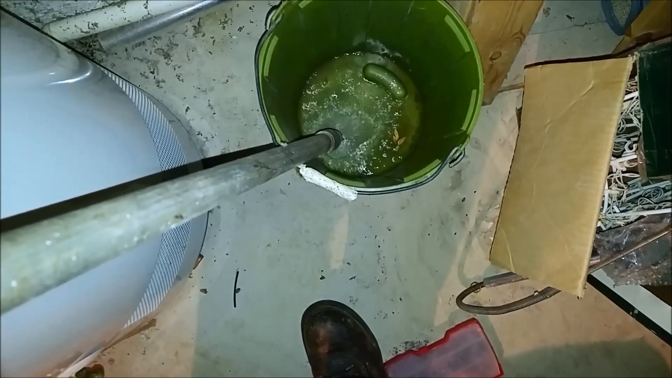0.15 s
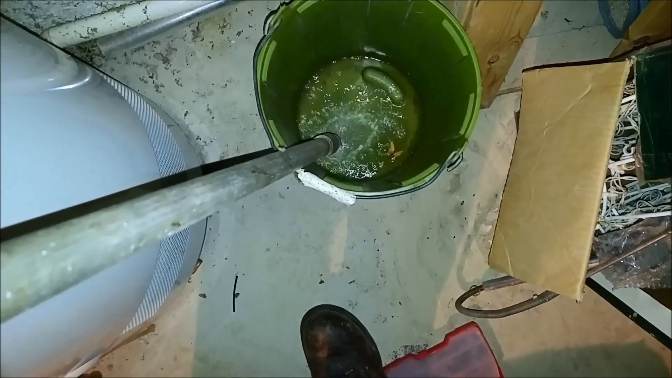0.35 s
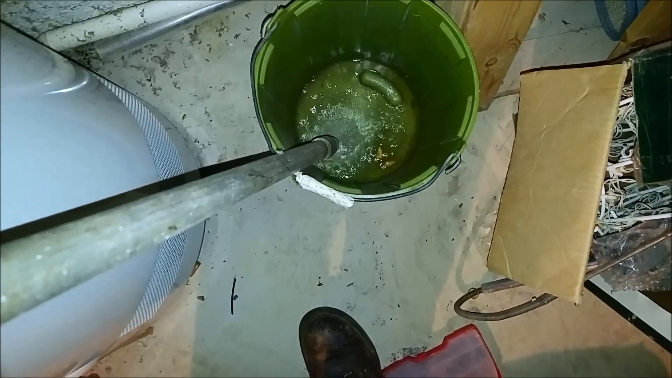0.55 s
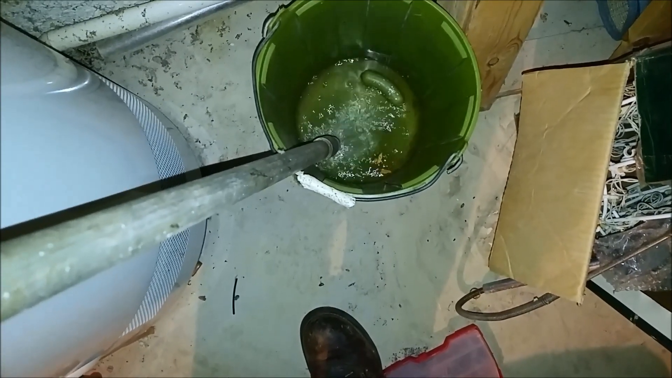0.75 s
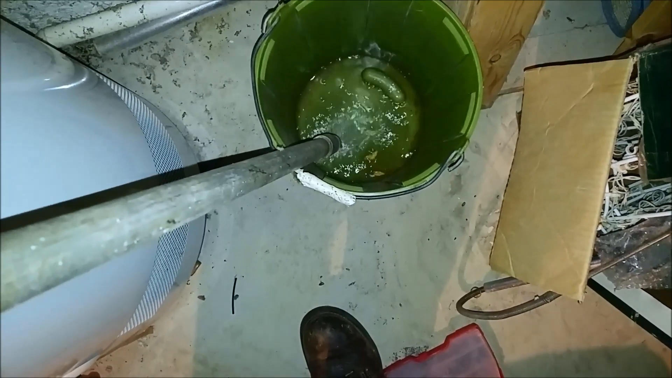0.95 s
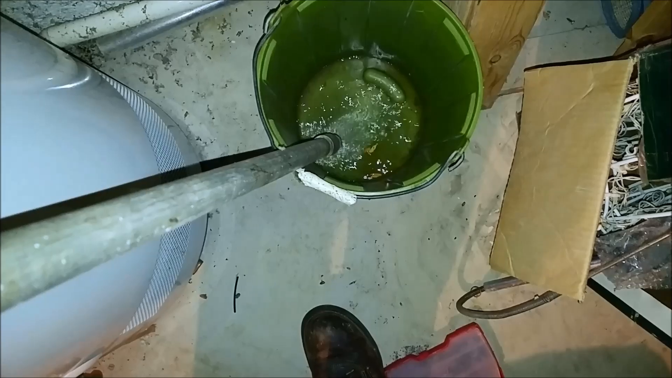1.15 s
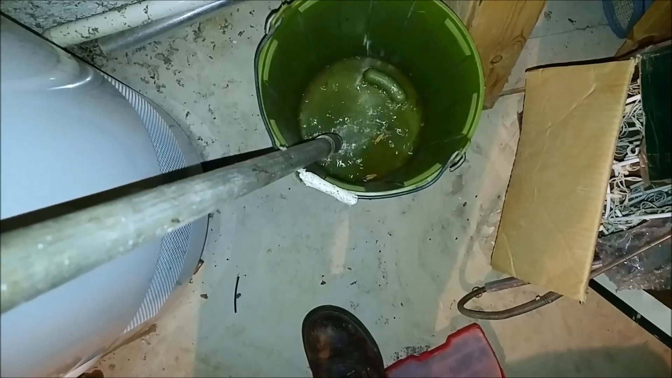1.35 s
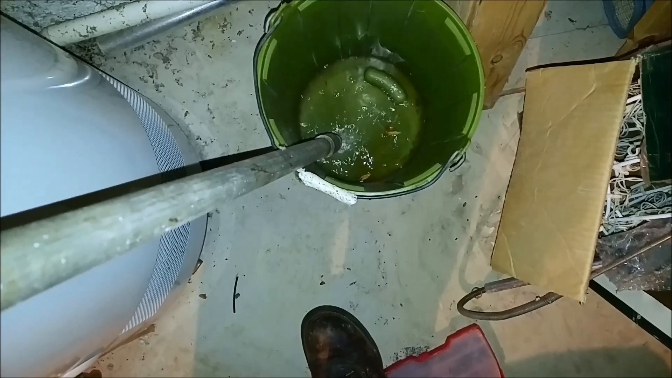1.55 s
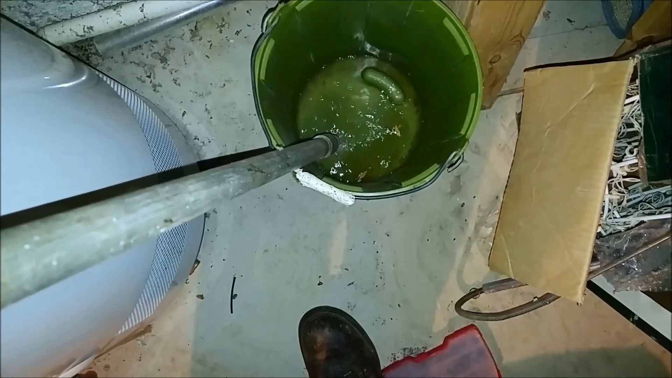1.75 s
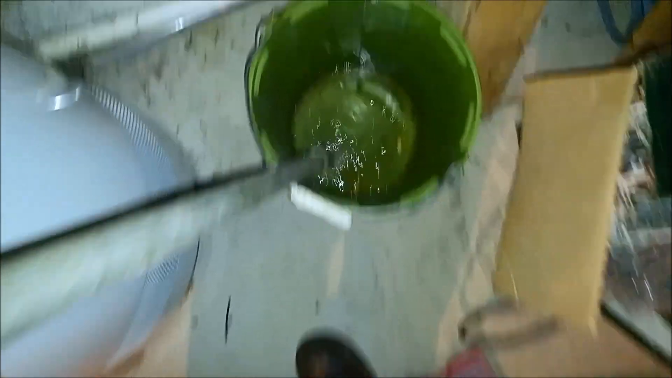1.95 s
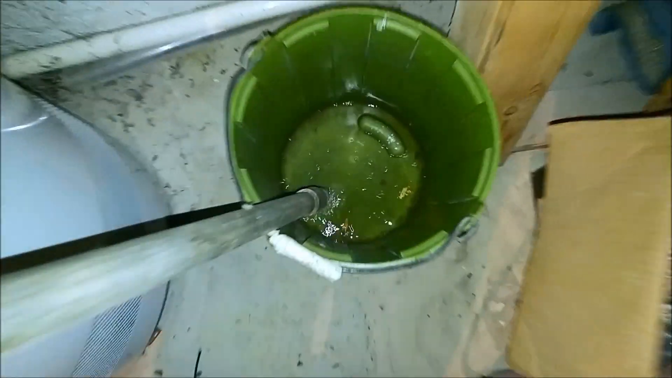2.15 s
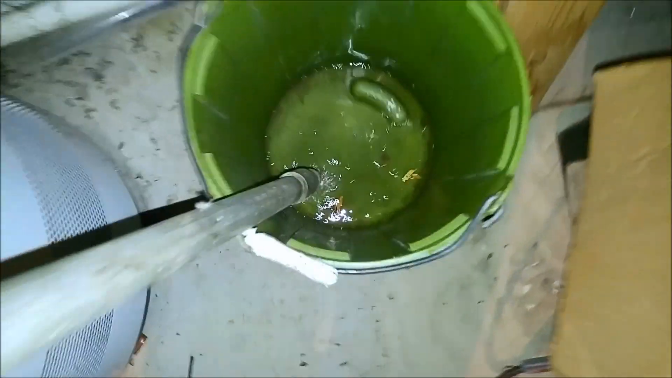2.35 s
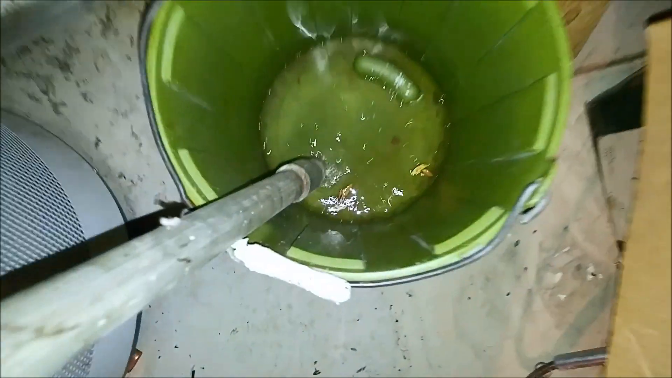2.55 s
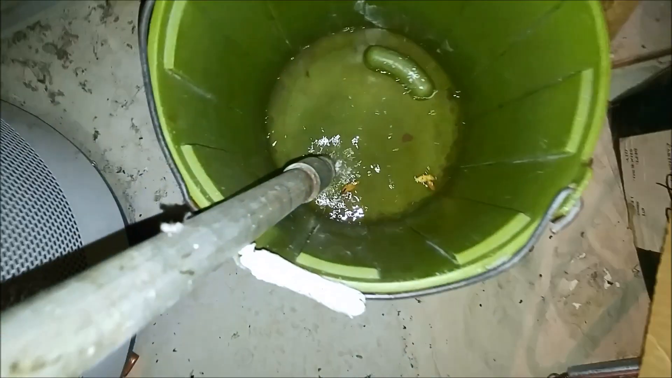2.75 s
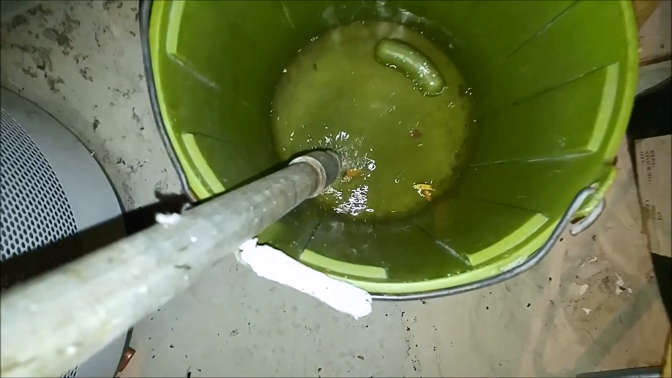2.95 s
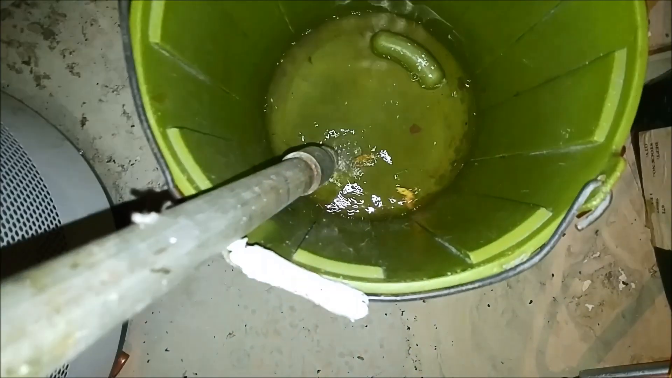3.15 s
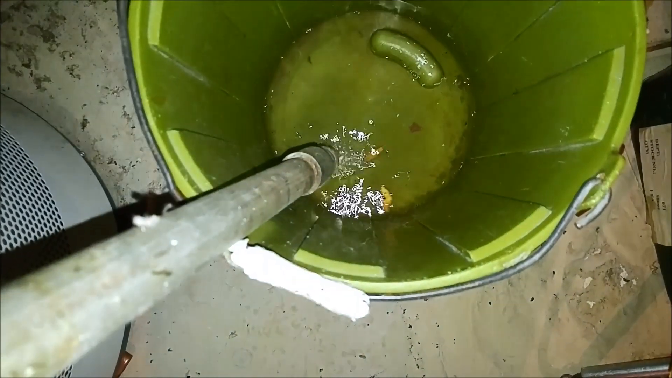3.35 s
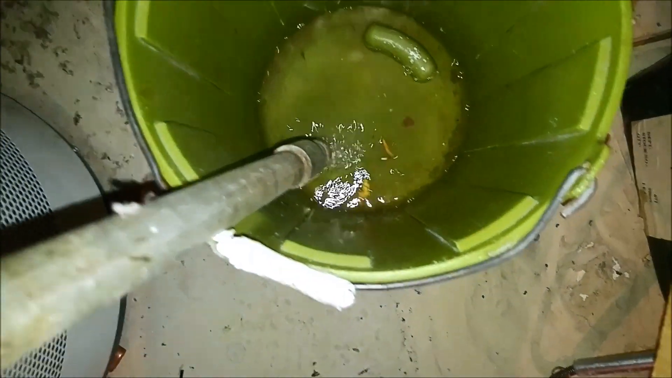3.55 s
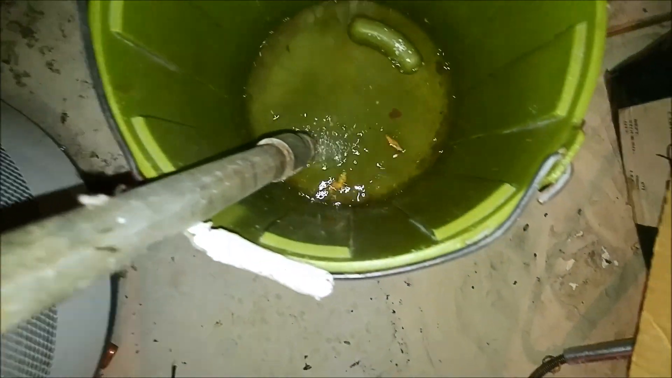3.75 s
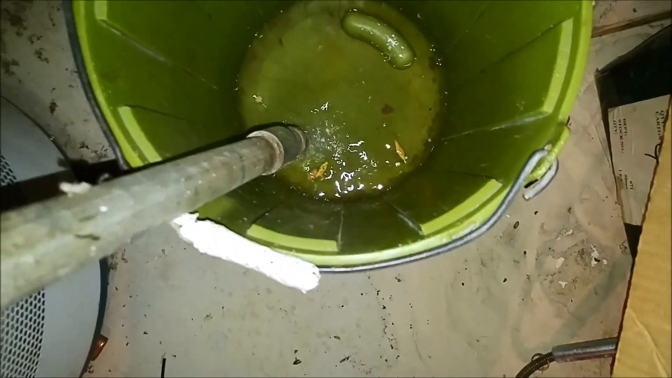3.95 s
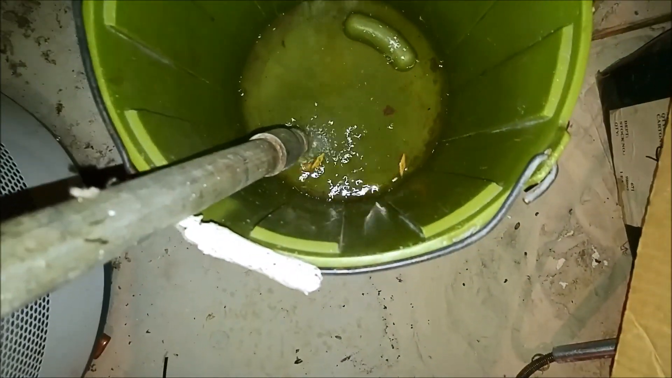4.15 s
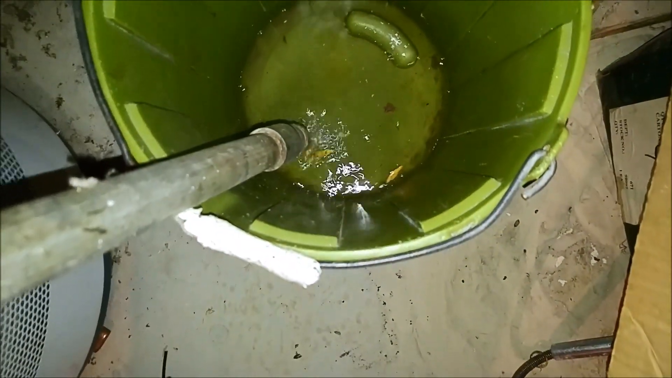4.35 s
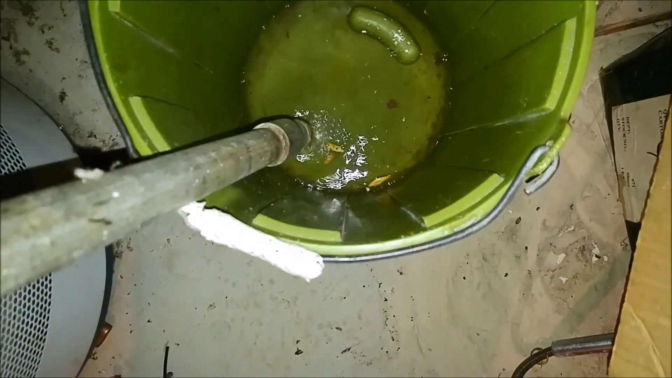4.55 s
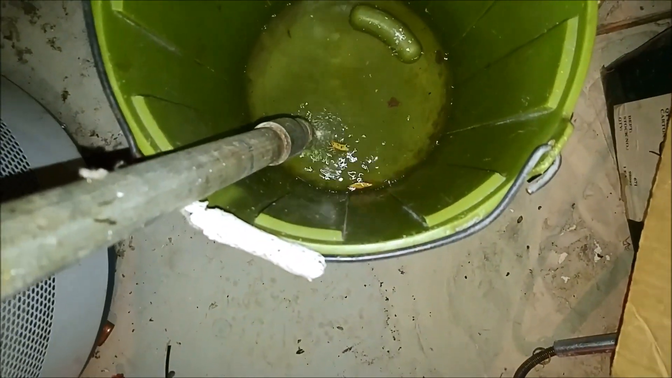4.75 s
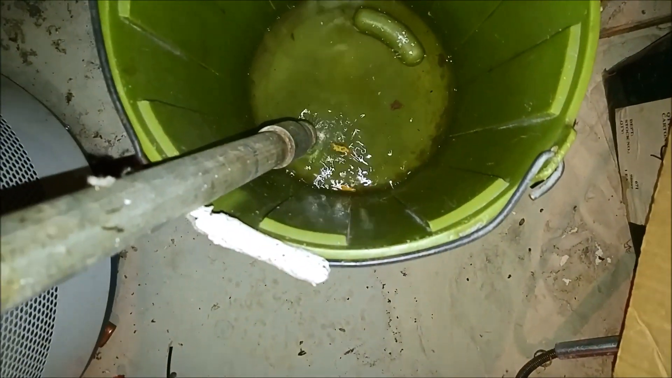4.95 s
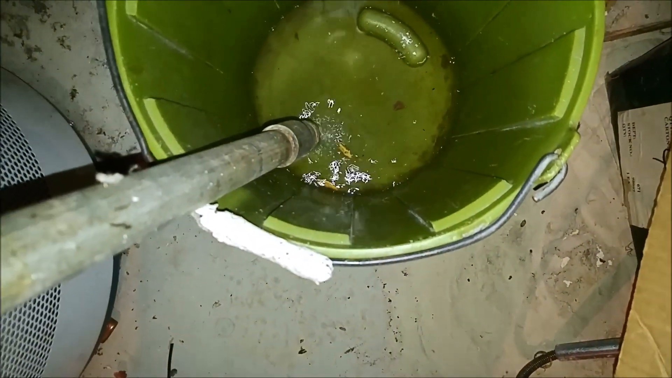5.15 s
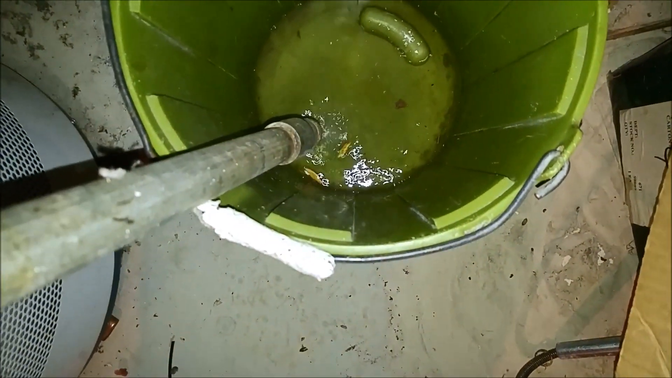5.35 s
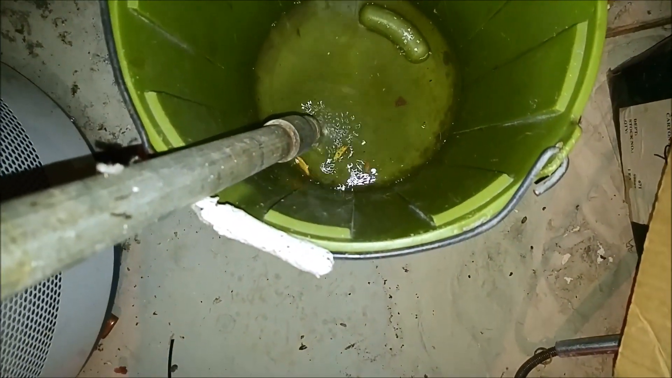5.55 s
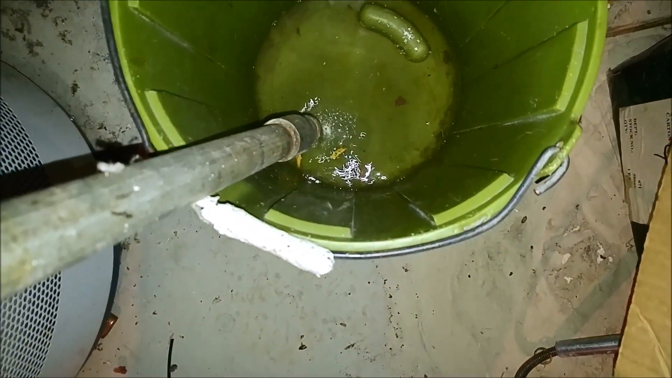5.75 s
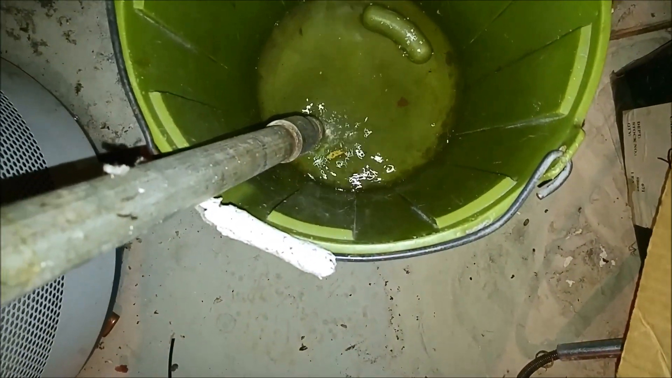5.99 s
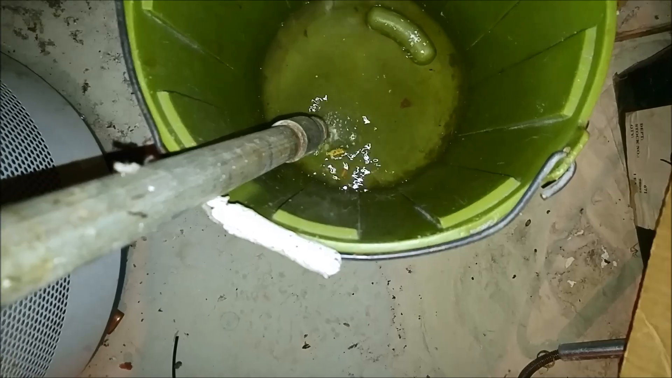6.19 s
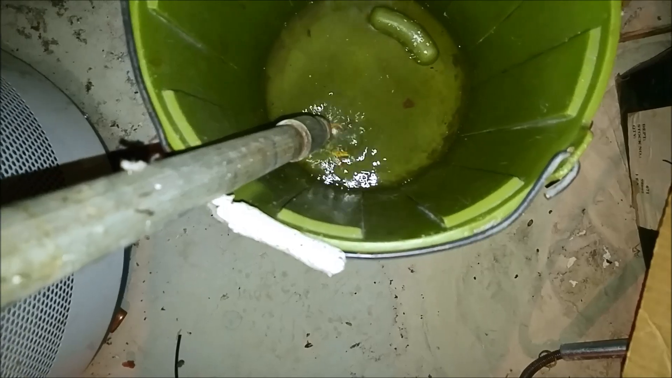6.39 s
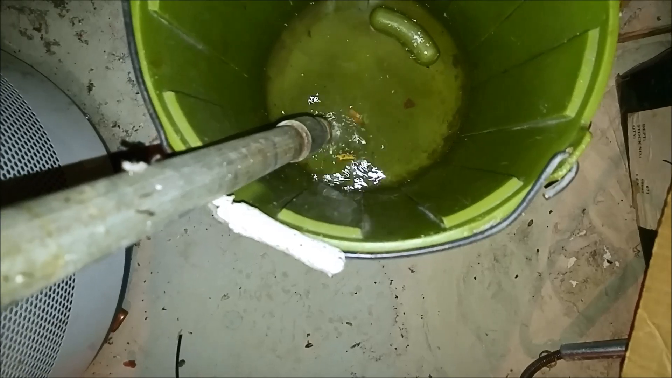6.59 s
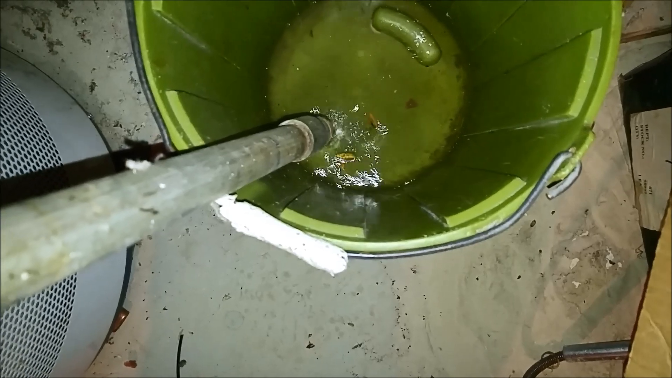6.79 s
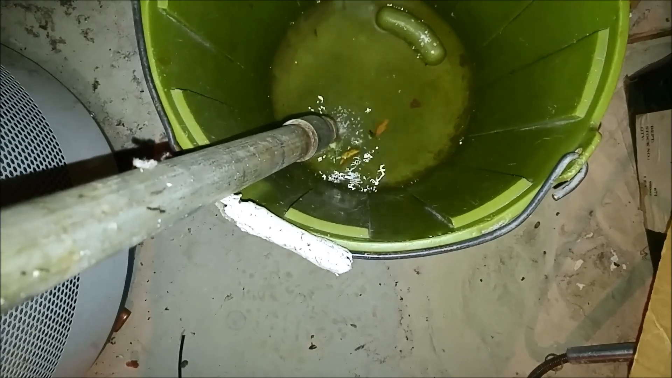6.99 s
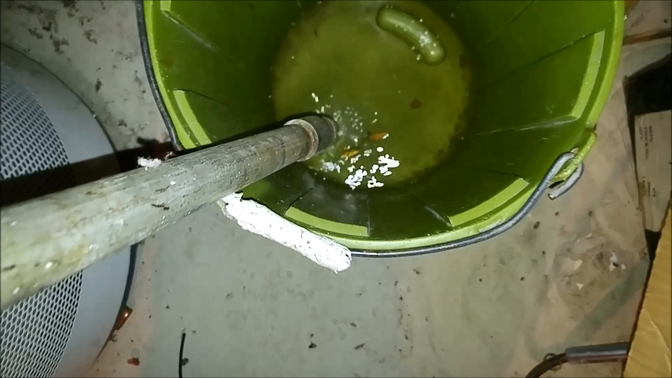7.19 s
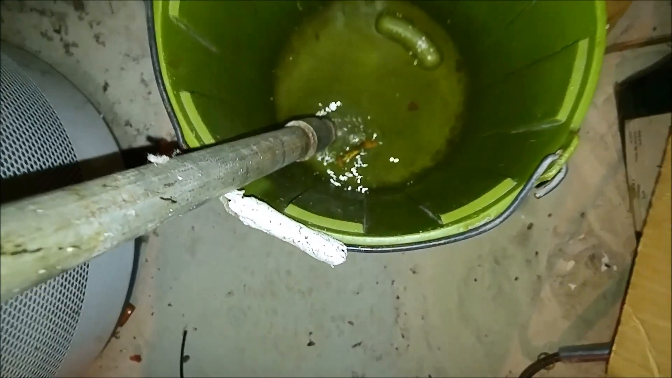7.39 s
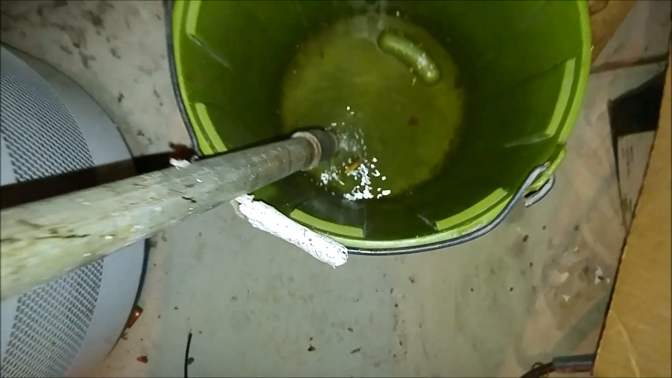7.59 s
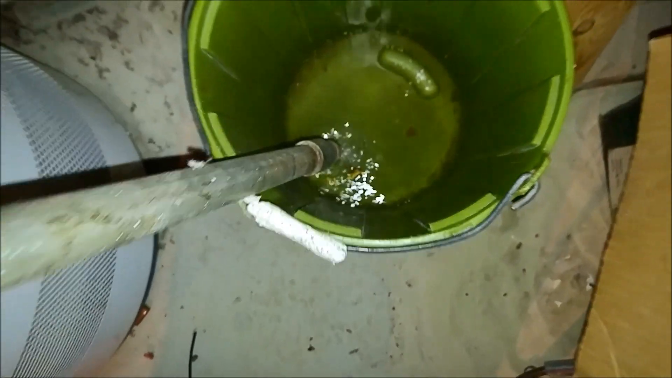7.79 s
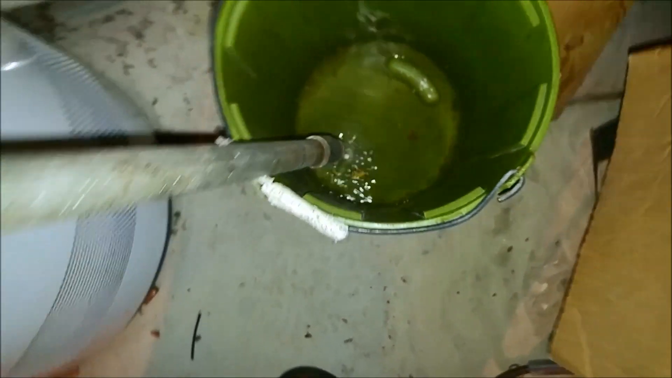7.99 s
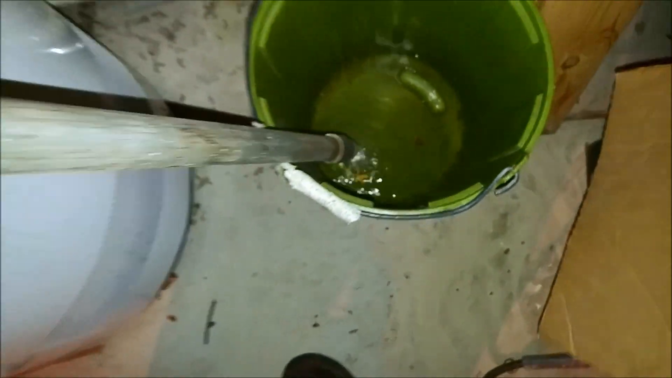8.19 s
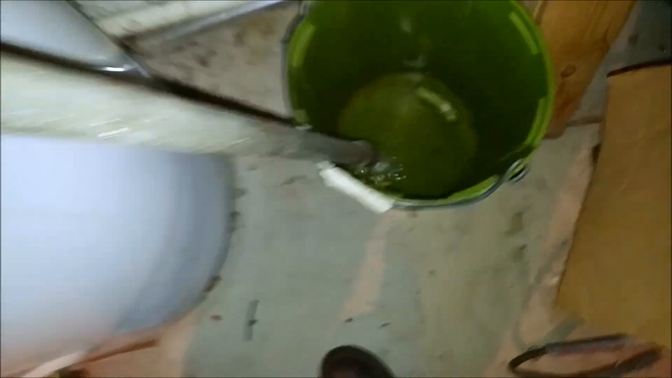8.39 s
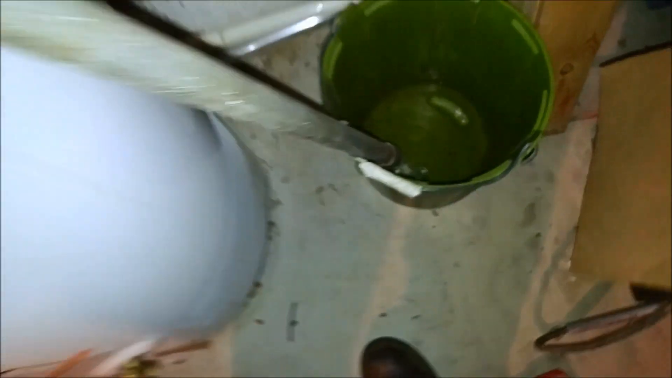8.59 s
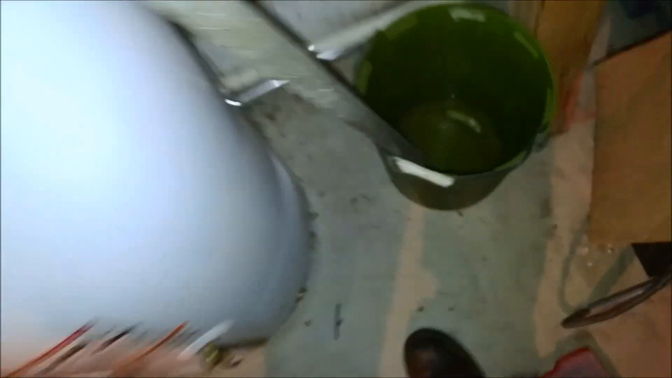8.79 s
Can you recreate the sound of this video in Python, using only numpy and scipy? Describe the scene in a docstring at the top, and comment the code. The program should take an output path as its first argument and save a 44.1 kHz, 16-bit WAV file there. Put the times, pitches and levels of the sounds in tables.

```python
"""Drain water in a plastic bucket

Water runs out of a drain pipe and splatters into a bucket with a shallow pool, in a utility room.
Noise bursts make the splats, climbing sines the bubbles, ringing grains the spray and churn, a noise band
the pipe hiss, a struck resonance one dull knock; air modes, echoes and a low rumble give the surroundings.
A hand-held two-port microphone leans in over the rim, then draws back."""
import sys
import numpy as np
from scipy import signal
from scipy.fft import rfft, irfft, next_fast_len
from scipy.io import wavfile
from scipy.ndimage import uniform_filter1d, map_coordinates

SR = 44100
rng = np.random.default_rng(int(sys.argv[2]) if len(sys.argv) > 2 else 0)


def log_audio(samples):
    """Write samples as a 16-bit WAV file to the path given in sys.argv[1]."""
    # one column per channel
    frames = np.atleast_2d(samples).T
    # limit to full scale, then quantise
    limited = np.clip(frames, -1, 1)
    pcm = np.round(limited * 32767).astype(np.int16)
    wavfile.write(sys.argv[1], SR, pcm)


N = 389398
SIZE = next_fast_len(N + SR // 2)   # FFT length, with room for the tails
HZ = np.maximum(np.arange(SIZE // 2 + 1) * SR / SIZE, 1)
SPOTS = 5   # places on the pool where water lands


def pool():
    """Falling water makes spray, fizz, churn, splats and bubbles at every spot, before the bucket colours them."""
    # strength of the stream: start_s, spray_db, churn_db
    stream = [(0.0, -39.5, -52), (0.15, -39.5, -48), (0.19, -49, -56), (0.22, -36, -50), (0.28, -42, -46),
              (0.33, -44, -56), (0.37, -35.5, -49), (0.42, -45.5, -51), (0.48, -34.5, -33),
              (0.57, -40, -48), (0.67, -38.5, -42.5), (0.72, -34, -46), (0.9, -36.5, -40.5),
              (1.79, -35, -48.5), (2.06, -38.5, -56), (2.53, -33, -42.5), (2.85, -33.5, -39),
              (3.86, -30, -43.5), (4.2, -33.5, -39.5), (4.82, -31.5, -34.5), (4.97, -32, -32.5),
              (5.08, -34, -52), (5.25, -31.5, -42), (7.01, -35, -36), (8.12, -38.5, -43),
              (8.29, -44.5, -43), (8.68, -57, -47.5), (8.83, -61, -51)]
    # loudest drops bursting: start_s, onset_level_db, centre_hz, spatter_db (against the sputter)
    loud_drops = [(0.044, -25, 8000, 5), (0.1174, -21, 8250, 2), (0.1438, -16, 8600, -14),
                  (0.2052, -26, 7100, 15), (0.2636, -22.5, 7300, -5), (0.471, -17.5, 9600, -12),
                  (0.4941, -12, 8700, -18), (0.599, -24.5, 7440, -20), (0.7008, -20, 8000, -13),
                  (0.7812, -19.5, 5570, 1), (0.9278, -18, 8100, -10), (1.0016, -23, 9460, -16),
                  (1.0301, -23, 8150, -29), (1.0949, -21.5, 5750, -3), (1.1528, -24, 5130, -18),
                  (1.1814, -18.5, 8050, -24), (1.206, -20, 8500, -19), (1.2535, -26, 9000, -12),
                  (1.3284, -25.5, 8300, -10), (1.5045, -26, 7900, 2), (1.6267, -30, 7360, -13),
                  (1.6551, -25, 8460, -10), (1.7115, -23, 8910, -22), (1.728, -21, 8750, -18),
                  (1.7614, -20, 6550, -18), (1.8243, -19, 10900, -21), (2.0524, -22.5, 8220, -18),
                  (2.0718, -19.5, 7640, 5), (2.1121, -15, 8600, -29), (2.2732, -27, 8200, -1),
                  (2.396, -21.5, 7760, -6), (2.5621, -27, 6920, -16), (2.6267, -22.5, 8350, -3),
                  (2.7516, -22.5, 10100, -15), (2.7906, -19.5, 4930, -23), (2.92, -22.5, 8800, -8),
                  (3.0179, -23, 7320, -7), (3.034, -19, 8900, -4), (3.0682, -16.5, 11300, -3),
                  (3.1827, -26, 7300, -20), (3.2455, -22, 8850, -8), (3.2906, -24, 8300, -26),
                  (3.3523, -31, 6070, -20), (3.3653, -20, 8200, -25), (3.3935, -20, 8100, -6),
                  (3.6075, -21, 8640, -23), (3.709, -16.5, 7400, -15), (3.7556, -13.5, 5430, -11),
                  (3.8388, -14, 4850, -6), (3.9018, -13, 6470, -22), (3.9409, -15.5, 7460, 0),
                  (4.0293, -19, 10100, -29), (4.0672, -21.5, 8730, -34), (4.0941, -22, 9800, -14),
                  (4.114, -22, 7520, -24), (4.2835, -23, 4790, 1), (4.3765, -15.5, 4780, -5),
                  (4.5386, -20.5, 8420, -22), (4.571, -18, 6500, -15), (4.6086, -18, 7500, -10),
                  (4.65, -20, 7430, -26), (4.7094, -14, 7550, -17), (4.7882, -9, 8600, -24),
                  (4.8155, -30, 8140, -16), (4.8334, -20.5, 5940, -16), (4.8602, -15.5, 6540, -1),
                  (4.9264, -15, 6660, -5), (4.951, -16, 6640, -20), (5.1087, -20, 5150, -18),
                  (5.1836, -22, 8540, -14), (5.2081, -23, 8300, -13), (5.231, -17.5, 6000, -13),
                  (5.3197, -20, 7350, -27), (5.5034, -23, 6660, -16), (5.553, -19, 6330, -21),
                  (5.577, -21, 8600, -32), (5.6538, -20.5, 7800, -18), (5.7169, -22, 7400, -16),
                  (5.7872, -26, 10100, -26), (5.8711, -14.5, 7250, -36), (5.9005, -29, 8540, -24),
                  (5.9163, -8.5, 5740, -24), (5.9582, -13, 9700, -17), (6.0452, -16, 8300, -11),
                  (6.169, -19, 9650, -30), (6.2302, -24.5, 8540, -4), (6.2741, -21, 8100, -20),
                  (6.2922, -20, 7700, -18), (6.4253, -19, 4970, -22), (6.5062, -20, 8800, -5),
                  (6.558, -21, 8600, -14), (6.6041, -14.5, 6100, -32), (6.646, -14, 9500, -11),
                  (6.7006, -14, 9550, -16), (6.7313, -16.5, 8500, -15), (6.792, -14, 7200, -12),
                  (6.8833, -16.5, 8450, -9), (6.977, -12, 6800, -21), (7.0394, -21, 6530, -28),
                  (7.1441, -9, 8000, -25), (7.19, -19, 6180, -19), (7.2878, -24.5, 6300, 10),
                  (7.4294, -19, 6500, -12), (7.5148, -15.5, 5900, -29), (7.5398, -19.5, 9900, -27),
                  (7.559, -21, 6000, -21), (7.5756, -15, 5630, -4), (7.6317, -17.5, 8300, 3),
                  (7.6956, -21.5, 6640, -13), (7.7536, -18, 8450, -36), (7.8755, -20, 5950, -19),
                  (7.8935, -13, 8500, -22), (7.9219, -24, 7400, -17), (7.9409, -22, 5870, -18),
                  (7.9643, -20, 9300, -17), (8.0336, -25, 7500, -18), (8.0576, -23.5, 7260, -26),
                  (8.1284, -21.5, 6000, -10), (8.1732, -20, 8500, -20), (8.2053, -25, 7500, -27),
                  (8.2354, -25, 8550, -19), (8.2532, -23, 7600, -16), (8.288, -29.5, 8750, -21),
                  (8.33, -32, 8890, -25), (8.4345, -28, 6100, -15), (8.4622, -28, 7960, -6),
                  (8.5091, -28, 8300, -36), (8.552, -15.5, 8300, -13), (8.6122, -29, 8000, -5),
                  (8.6455, -32, 5500, -14), (8.6937, -22, 7240, -11), (8.752, -24, 8300, -12),
                  (8.8168, -32, 7100, -13)]
    # loudest bubbles: start_s, tone_level_db, pitch_hz, slosh_db (against the tone)
    loud_bubbles = [(0.47, -25, 880, -9), (0.601, -20.5, 2620, -12), (0.733, -24, 2470, -17),
                    (0.753, -15, 2130, -11.5), (0.83, -23, 1450, -11), (1.036, -15.5, 1300, -15),
                    (1.105, -22.5, 2020, -6), (1.365, -21.5, 2120, -13), (1.447, -22, 2060, -16),
                    (1.461, -19, 1660, -12), (1.518, -23.5, 1990, -6.5), (1.541, -20, 1250, -12),
                    (1.574, -16.5, 2900, -9), (1.668, -24, 2360, -2.5), (1.7, -17.5, 2570, -9),
                    (1.73, -21.5, 2540, -6), (1.762, -17.5, 3400, -4), (1.849, -24, 3120, -3),
                    (1.894, -19, 2070, -15), (1.977, -14.5, 2390, -19), (2.092, -22.5, 1710, -4.5),
                    (2.174, -20.5, 2400, -4.5), (2.499, -28, 1990, -11), (2.681, -20, 2260, -10),
                    (3.035, -23.5, 2080, -5.5), (3.07, -22.5, 2460, -2.5), (3.105, -25.5, 2760, -2),
                    (3.248, -11.5, 3120, -13), (3.372, -20, 3100, -12), (3.886, -20.5, 704, -2.5),
                    (3.972, -17, 3120, -2), (4.27, -14.5, 1270, -4.5), (4.332, -22.5, 3370, -4),
                    (4.376, -19.5, 2600, -5.5), (4.548, -13, 2740, -27), (4.592, -16, 1640, -6),
                    (4.724, -14.5, 2800, -8.5), (4.791, -8.5, 2410, -10.5), (4.89, -19, 1610, -2),
                    (4.953, -20.5, 3310, -3.5), (5.235, -13, 2600, -9), (5.282, -12.5, 1770, -3.5),
                    (5.43, -24, 1980, -11), (5.548, -17.5, 920, -3.5), (5.641, -20, 1980, -6.5),
                    (5.79, -16, 2520, -4.5), (5.878, -10, 1660, -8), (5.92, -15, 1790, -10),
                    (5.987, -13.5, 1770, -30), (6.14, -12, 1200, -8), (6.232, -17, 1760, -2),
                    (6.27, -15.5, 1700, -2.5), (6.402, -16, 1700, -8.5), (6.424, -22, 2600, -7),
                    (6.573, -17.5, 2680, -9), (6.631, -16, 1660, -16), (6.715, -17, 1900, -8),
                    (6.753, -20.5, 715, -0.5), (6.828, -23, 835, -4.5), (6.864, -18.5, 1850, -1.5),
                    (7.072, -13.5, 2950, -12), (7.103, -18.5, 1600, -12), (7.162, -20, 1690, -20),
                    (7.191, -14, 2830, -14), (7.22, -18.5, 1260, -4), (7.284, -25, 2900, -9),
                    (7.44, -27, 2700, -3), (7.472, -15.5, 1480, -9.5), (7.506, -19, 730, -9),
                    (7.523, -19.5, 1610, -6), (7.582, -16.5, 1620, -3.5), (7.632, -16.5, 2350, -5.5),
                    (7.697, -24, 3000, -7), (7.749, -25, 1720, -4), (7.79, -23, 1210, -12),
                    (7.884, -18.5, 880, -9), (7.944, -26, 1230, -20), (8.034, -20.5, 1190, -11),
                    (8.092, -25, 824, -11), (8.135, -13.5, 1430, -7.5), (8.174, -22, 1220, -19),
                    (8.239, -24.5, 2000, -10), (8.384, -24.5, 1250, -2.5), (8.464, -31, 2120, -6),
                    (8.511, -32, 1160, -6), (8.552, -22.5, 1130, -3), (8.566, -25.5, 920, -2.5),
                    (8.61, -25, 806, -1.5), (8.624, -27, 910, -3), (8.695, -34, 2000, -4.5),
                    (8.766, -36, 816, -7), (8.775, -28, 3700, -33)]
    lesser_spatter_db, lesser_slosh_db = -10, -4
    spray_db, churn_db = in_time(stream)

    gush = drift(20)   # the stream breaks into lumps
    spray_clumps = from_db(3.3 * gush + 4 * drift(50))
    churn_clumps = from_db(1.5 * gush + 4 * drift(20))
    spray = grains(1000, 4130, 12700, cycles=10.6, spread_db=2.5, clumps=spray_clumps)
    churn = grains(300, 425.5, 3270, cycles=18, spread_db=3.5, clumps=churn_clumps)
    soft_noise = signal.lfilter([.5], [1, -.55], rng.standard_normal((SPOTS, N)))
    fizz = soft_noise * from_db(2.3 * gush + 2.7 * drift(75))
    bed = from_db(spray_db) * (spray + from_db(-4) * fizz) + from_db(churn_db) * churn

    # lesser drops follow the spray level, lesser bubbles the churn level
    drops = scatter(12, spray_db + 8, spread_db=3, low_hz=4640, high_hz=10200)
    bubbles = scatter(48, churn_db + 8, spread_db=3, low_hz=750, high_hz=3200)
    all_drops = list(loud_drops) + [(*row, lesser_spatter_db) for row in drops]
    all_bubbles = list(loud_bubbles) + [(*row, lesser_slosh_db) for row in bubbles]
    return bed + splats(all_drops) + blips(all_bubbles)


def splats(table):
    """Each drop cracks broadly, sputters a few ms around its own centre, and its spatter rains down after."""
    crack_db, crack_t60_s, sputter_t60_s, spatter_t60_s = 5.5, .0011, .013, .15
    low_cut_hz = 3440
    length = 4000   # samples
    out, s = np.zeros((SPOTS, N + length)), np.arange(length) / SR
    for k, noise in enumerate(rng.standard_normal((len(table), length))):
        start_s, level_db, hz, spatter_db = table[k]
        # differencing brightens the crack
        crack = np.diff(noise * from_db(crack_db - 60 * s / crack_t60_s), prepend=0)
        sputter_fade = from_db(-60 * s / sputter_t60_s)
        spatter_fade = from_db(spatter_db - 60 * s / spatter_t60_s)
        dying = noise * (sputter_fade + spatter_fade)
        burst = ring(dying, hz, 7 / hz) + from_db(-20) * dying
        onset = np.sqrt(np.mean(burst[:100] ** 2))
        out[k % SPOTS, int(start_s * SR):][:length] += from_db(level_db) * (burst / onset + crack)
    low_cut = signal.butter(2, low_cut_hz, "high", fs=SR, output="sos")
    return signal.sosfilt(low_cut, out[:, :N] + 1e-18)


def blips(table):
    """A bubble rings as a dying sine whose pitch climbs; the cavity closing on it adds a plop and a dull slosh."""
    cycles, rise = 28, .004   # cycles to fall 60 dB at 2000 Hz; pitch climbs by twice the rise per cycle
    slosh_t60_s, plop_t60_s, plop_db = .055, .015, -7   # plop level against the slosh
    length = 2000   # samples
    out, s = np.zeros((SPOTS, N + length)), np.arange(length) / SR
    dull = signal.butter(2, [700, 1900], "band", fs=SR, output="sos")
    for k, noise in enumerate(rng.standard_normal((len(table), length))):
        start_s, level_db, hz, slosh_db = table[k]
        turns = hz * s * (1 + rise * hz * s)
        attack = 1 - np.exp(-s / .00051)
        decay = from_db(-60 * s * np.sqrt(hz * 2000) / cycles)   # big bubbles ring fewer cycles
        tone = attack * decay * np.sin(2 * np.pi * turns)
        slosh = rms_one(ring(ring(noise, hz, 2.3 / hz), hz, 2.25 / hz))
        slosh = slosh * from_db(slosh_db - 60 * s / slosh_t60_s)
        plop = rms_one(signal.sosfilt(dull, noise[::-1]))
        plop = plop * from_db(slosh_db + plop_db - 60 * s / plop_t60_s)
        out[k % SPOTS, int(start_s * SR):][:length] += from_db(level_db) * (tone + slosh + plop)
    return out[:, :N]


def grains(per_s, low_hz, high_hz, cycles, spread_db, clumps):
    """Random small bursts at every spot, bunched by the clumps control, each ringing a few cycles."""
    bands = 6
    out = np.zeros((SPOTS, N))
    for spot in range(SPOTS):
        at = np.flatnonzero(rng.random(N) < per_s / SPOTS * clumps / SR)
        size, sign, deal = rng.random((len(at), 3)).T
        # many small grains, few large ones
        sizes = from_db(spread_db * np.minimum(-np.log(1 - size), 4)) * np.sign(sign - .5)
        for k in range(bands):
            hz = low_hz * (high_hz / low_hz) ** ((k + spot / SPOTS) / bands)
            clicks, mine = np.zeros(N), (deal * bands).astype(int) == k
            clicks[at[mine]] = sizes[mine]
            soft = ring(clicks, hz, 4 / hz)   # rung twice: a soft start
            out[spot] += ring(soft, hz, cycles / hz) * hz / low_hz
    return rms_one(out) / np.sqrt(SPOTS)   # rms 1 for all spots together


def scatter(per_s, level_db, spread_db, low_hz, high_hz):
    """Up to 400 chance events as rows (start_s, level_db, hz), their level following a curve."""
    when, size, pitch = rng.random((400, 3)).T
    s = np.cumsum(-np.log(1 - when)) / per_s
    hz = low_hz * (high_hz / low_hz) ** pitch
    rows = np.transpose([s, spread_db * (2 * size - 1), hz])[s < N / SR]
    return [(s, db + level_db[int(s * SR)], hz) for s, db, hz in rows]


def hiss(place):
    """Water rushing inside the pipe: a firm, smooth noise band, louder near its mouth."""
    # level_db at each microphone place: standing, leaning in, over the rim, drawn back
    place_levels = [-64, -46, -47, -66]
    band = signal.butter(3, [2490, 3440], "band", fs=SR, output="sos")
    own, shared = rng.standard_normal((2, N)), rng.standard_normal(N)
    level_db = np.interp(place, range(len(place_levels)), place_levels)
    return rms_one(signal.sosfilt(band, own + shared)) * from_db(level_db)


def thud():
    """A soft blow sets a low body ringing for a few cycles: one dull knock close to the microphone."""
    start_s, blow_db, hz, t60_s = 8.428, -51.5, 390, .012   # level of the blow, t60 of each ringing
    click = np.zeros(N)
    click[int(start_s * SR)] = from_db(blow_db)
    return ring(ring(click, hz, t60_s), hz, t60_s)   # rung twice: a soft start


def walls(water):
    """Every spot reaches each port directly and by echoes of its own; broad bands keep their power."""
    # bucket wall echoes against the direct sound: pitch_hz, level_db
    echo_curve = [(200, -14), (600, -11), (1500, 3.5), (4000, 1.5), (12000, 11)]
    # room tail against the direct sound: pitch_hz, level_db
    room_curve = [(250, -13), (1000, -5), (4000, -9), (12000, -14)]
    echo_t60_s, room_t60_s = .0065, .18
    even_hz = 140   # width over which the echoes' power is evened out
    near, far = from_db(at_hz(echo_curve)), from_db(at_hz(room_curve))
    out = np.zeros((2, len(HZ)), complex)
    for spot in rfft(water, SIZE):
        for side in range(2):
            path = 1 + near * tail(echo_t60_s) + far * tail(room_t60_s)
            power = uniform_filter1d(np.abs(path) ** 2, size=int(even_hz * SIZE / SR))
            out[side] += spot * path / np.sqrt(power)
    return out


def bucket(heard, place):
    """Air modes and cancellations colour the water, blended between places as the microphone moves."""
    # air modes and cancellations, used at 0.99 of these levels:
    # pitch_hz, width_hz, standing_db, leaning_db, over_rim_db, drawn_back_db
    air_modes = [(273.2, 36, 7, 16, 19, 18.5), (354, 52, 1.5, 11, 10.5, 12.5),
                 (495, 65, -25, -26, -32.5, -25), (616, 16, 7.5, 5, 9, 9.5),
                 (702.5, 25, 6.5, 10.5, 11.5, 4.5), (891, 97, 7, 4, 4.5, 6.5), (933, 36, 2.5, 8.5, 2, -6),
                 (1026, 173, -4.5, -5.5, -7.5, -6.5), (1200, 64, 0.5, 6.5, 4.5, 7),
                 (1408, 194, 0.6, -6, -6, -7), (1760, 93, 0, -1.5, 2, -7), (2007, 38, 3, 7.5, 5, -1),
                 (2300, 520, -0.5, -2, -4, 0.8), (2600, 300, -2, 6, 3.5, -5), (3130, 690, -4, 3.5, 3, 1.5),
                 (3616, 153, 1, -6, -6.5, 2.5), (4320, 294, -3, -5, -5.5, -1.5),
                 (8600, 1100, 0.3, 0.5, -0.5, -0.7)]
    # broad colour of the path: pitch_hz, standing_db, leaning_db, over_rim_db, drawn_back_db
    path_colour = [(40, -49, -63, -59, -64), (110, -11, -16, -17.5, -19), (203, -11.5, -17, -16, -18),
                   (614, -3.5, -10, -10.5, -7), (1490, -1.5, -2.5, -1.5, 1), (3300, -1.5, -5, -4.5, -2),
                   (6000, -1.5, -3, -1.4, -3.5), (8500, 3, 1, 1, 1.5), (11340, -1.5, -2.5, -1.5, -4),
                   (16000, 2.5, 0, -1.5, 3)]
    modes, broad = np.array(air_modes), np.array(path_colour)
    colours = modes[:, 2:].T @ bump(modes[:, :1], modes[:, 1:2], 0.99)
    out = 0
    for k, db in enumerate(colours):
        response = causal(db + at_hz(broad[:, [0, k + 1]]))
        coloured = irfft(heard * response, SIZE)[:, :N]
        out = out + coloured * np.clip(1 - np.abs(place - k), 0, 1)
    return out


def ports(sound, lead_ms):
    """Each port has its own colour; the right one hears later."""
    # balance shared between the ports: pitch_hz, left_minus_right_db
    port_balance = [(60, -10.5), (92, -8.5), (140, -1.0), (210, -2.0), (330, -1.5), (500, 1.5), (770, 0.5),
                    (1170, 0.0), (1790, -3.5), (2740, -7.0), (4190, -4.0), (6410, 1.0), (9810, 4.5),
                    (15000, 5.5)]
    # further lift and cancellation at the right port: pitch_hz, width_hz, level_db
    right_bumps = [(3000, 700, 3), (7700, 600, -7)]
    lead_rad, lead_hz = .6, 330   # phase by which the left leads above the bass, and where it sets in
    late = map_coordinates(sound[1], [np.arange(N) - lead_ms * SR / 1000], order=3, mode="nearest")
    lead = lead_rad / (1 + (lead_hz / HZ) ** 2)
    half_balance = at_hz(port_balance) / 2
    left = causal(half_balance) * np.exp(.5j * lead)
    right = causal(sum(bump(*row) for row in right_bumps) - half_balance) * np.exp(-.5j * lead)
    return irfft(rfft([sound[0], late], SIZE) * [left, right], SIZE)[:, :N]


def rumble():
    """Low room noise, unrelated in the two channels, swelling as the hand moves."""
    # relative spectrum: pitch_hz, density_db (per Hz)
    rumble_colour = [(20, -10), (45, -8.5), (65, -1.5), (130, -8.5), (250, -6), (600, -18), (16000, -74)]
    # base level_db before the swell: left, right
    side_levels = [-69, -57]
    # swell with the hand: start_s, lift_db
    hand_swell = [(0, 0.5), (1.8, 0), (2.15, 7), (2.8, 2), (8.83, 1.5)]
    noise = irfft(rfft(rng.standard_normal((2, SIZE))) * from_db(at_hz(rumble_colour)), SIZE)[:, :N]
    swell_db = in_time(hand_swell)[0] + 1 * drift(5.7)   # wavers by 1 dB
    return rms_one(noise) * from_db(side_levels)[:, None] * from_db(swell_db)


def from_db(db):
    """Gain of a level in dB."""
    return 10 ** (np.asarray(db) / 20)


def rms_one(x):
    """Scaled to rms 1."""
    return x / np.sqrt(np.mean(x ** 2) + 1e-20)


def in_time(rows):
    """Curve columns at every sample."""
    s, *columns = np.transpose(rows)
    return [np.interp(np.arange(N) / SR, s, c) for c in columns]


def at_hz(points):
    """A spectrum in dB on the FFT grid, straight lines over log pitch."""
    hz, db = np.array(points).T
    return np.interp(np.log(HZ), np.log(hz), db)


def bump(hz, width, db):
    """A resonant peak or dip in dB; the width is taken at half the dB."""
    return db / (1 + (2 * (HZ - hz) / width) ** 2)


def causal(db):
    """Minimum-phase response for a level in dB on the FFT grid."""
    cepstrum = irfft(db * np.log(10) / 20, SIZE)
    cepstrum[1:SIZE // 2] *= 2
    cepstrum[SIZE // 2 + 1:] = 0
    return np.exp(rfft(cepstrum))


def drift(rate_hz):
    """Slow random wander of rms 1, noise smoothed above the rate."""
    step = 20   # samples between control points
    r = np.exp(-2 * np.pi * rate_hz * step / SR)
    noise = rng.standard_normal(N // step + 4002)
    slow = signal.lfilter([1], [1, -2 * r, r * r], noise)[4000:]   # settled part
    return np.interp(np.arange(N) / step, np.arange(len(slow)), rms_one(slow))


def ring(clicks, hz, t60_s):
    """A damped resonator: a unit click sets a sine of height 1 ringing."""
    r, w = from_db(-60 / (t60_s * SR)), 2 * np.pi * hz / SR
    return signal.lfilter([0, np.sin(w)], [1, -2 * r * np.cos(w), r * r], clicks + 1e-18)


def tail(t60_s):
    """Response of dense echoes dying away, energy 1."""
    s = np.arange(SR // 2) / SR
    echoes = rng.standard_normal(len(s)) * from_db(-60 * s / t60_s) * (s > .0004)
    return rfft(echoes / np.sqrt(np.sum(echoes ** 2)), SIZE)


def scene():
    """Water through walls and bucket, pipe hiss and knock reach the ports; room noise is added."""
    # the microphone: start_s, place (0 standing, 1 leaning in, 2 over the rim, 3 drawn back), left_lead_ms
    mic_moves = [(0, 0.05, .3), (2.1, 0.05, .3), (2.5, 1, .12), (3.5, 1, .12), (4.3, 2, .12), (7.6, 2, .12),
                 (8.2, 3, .1), (8.83, 3, .06)]
    place, lead_ms = in_time(mic_moves)
    place = np.clip(place + .15 * drift(1.5), 0, 3)   # the hand sways between places
    water = bucket(walls(pool()), place)
    return ports(water + hiss(place) + thud(), lead_ms) + rumble()


def record(dry):
    """The top is cut: 70 dB down from 16.5 kHz."""
    return signal.sosfilt(signal.cheby2(14, 70, 16500, fs=SR, output="sos"), dry)


dry = scene()
out = record(dry)
log_audio(out)
```